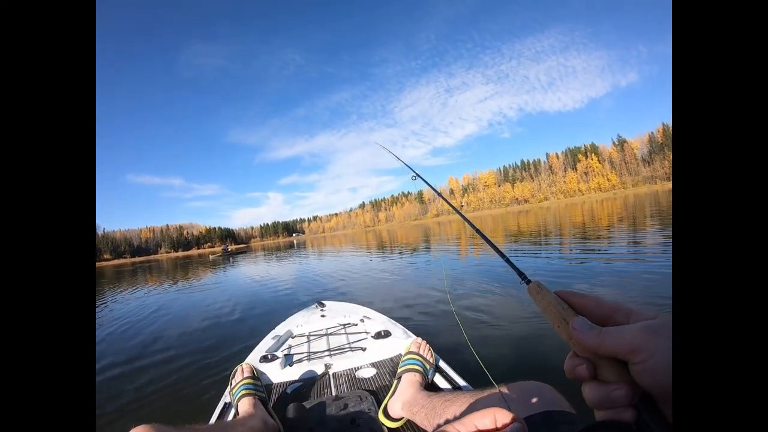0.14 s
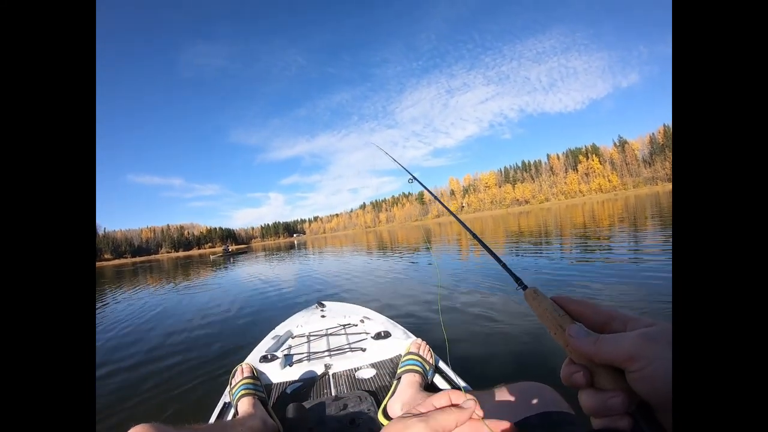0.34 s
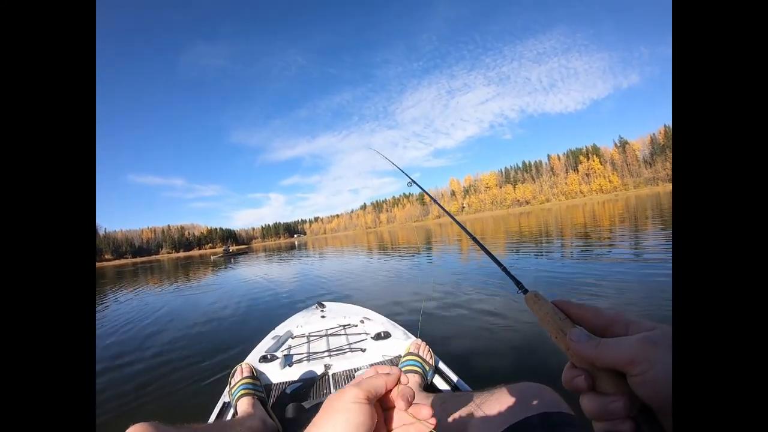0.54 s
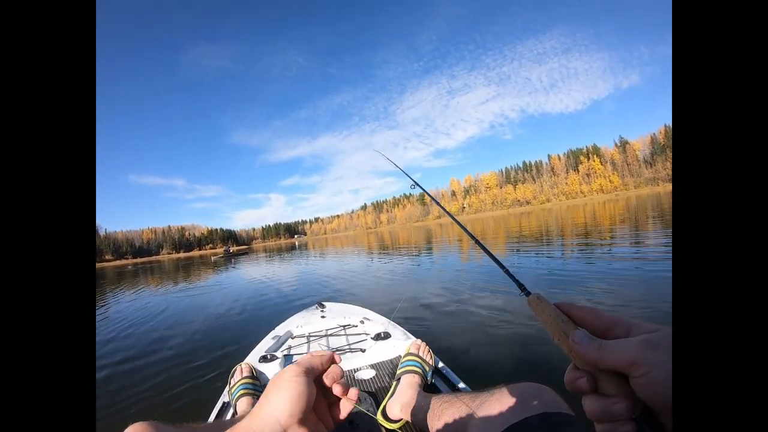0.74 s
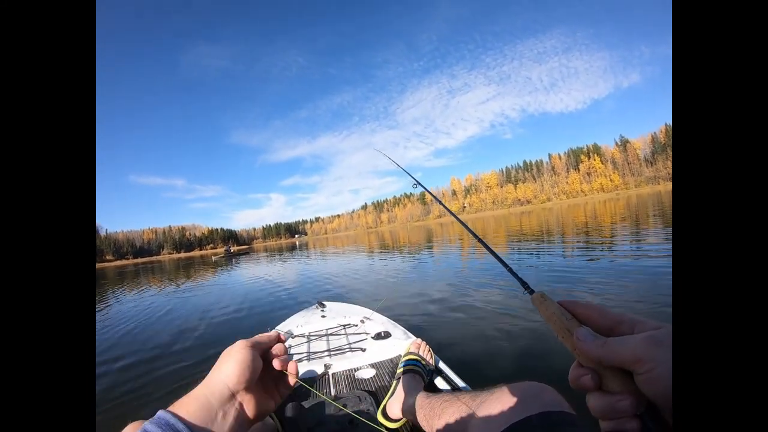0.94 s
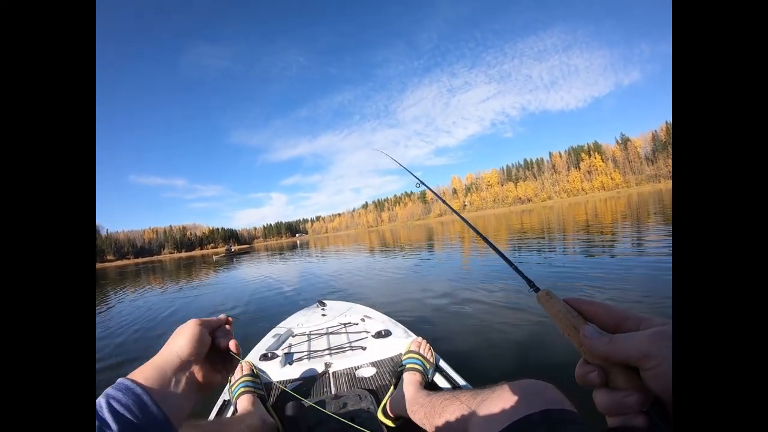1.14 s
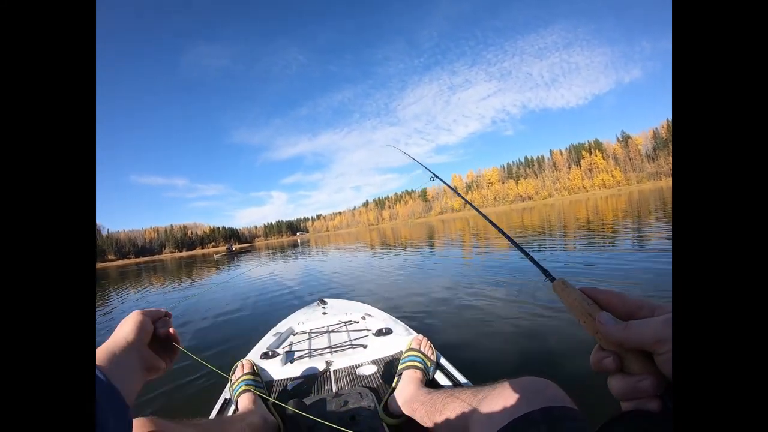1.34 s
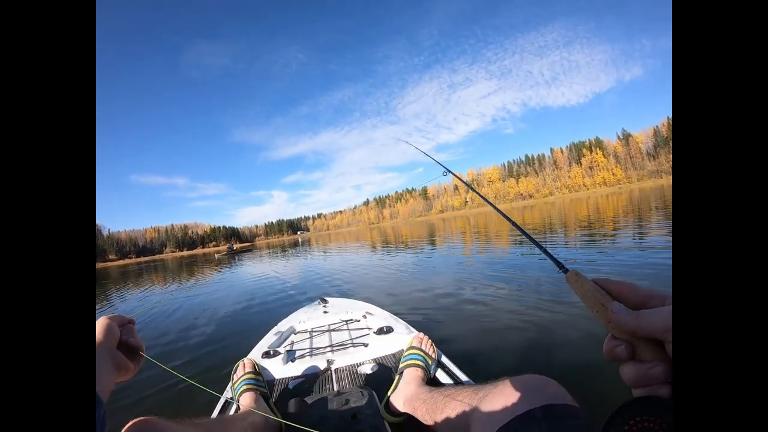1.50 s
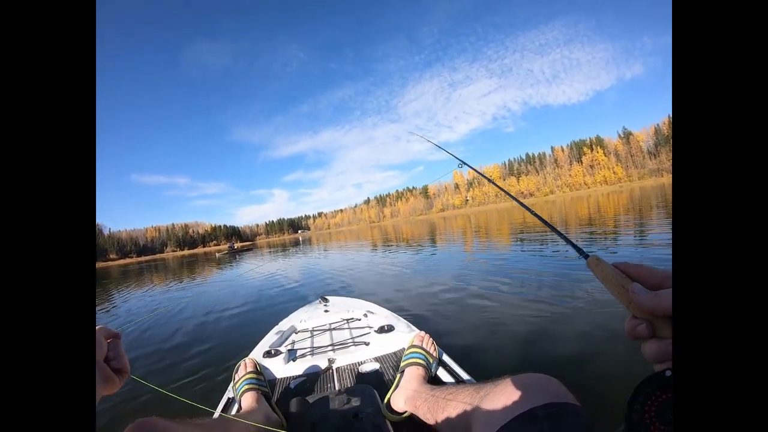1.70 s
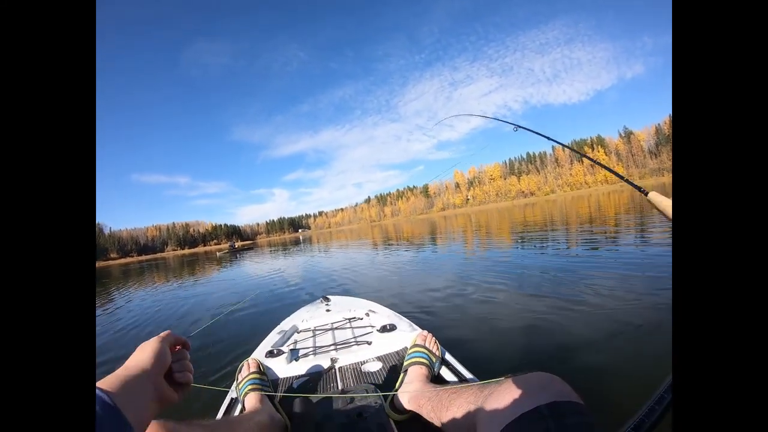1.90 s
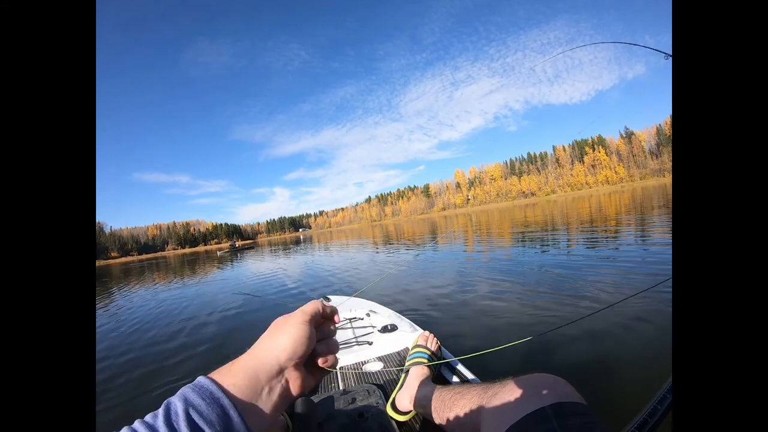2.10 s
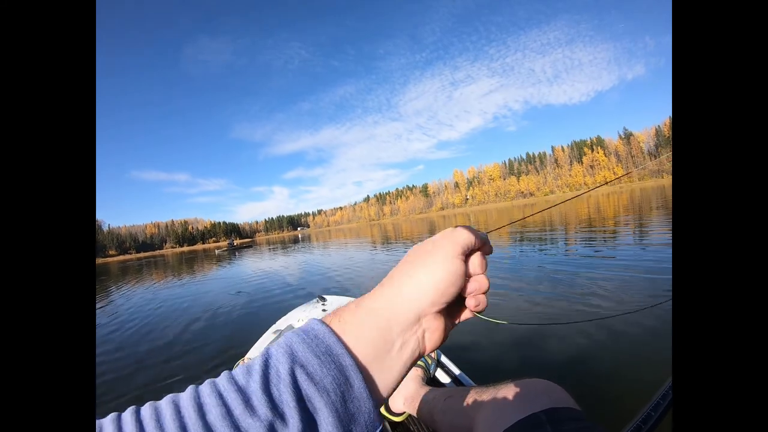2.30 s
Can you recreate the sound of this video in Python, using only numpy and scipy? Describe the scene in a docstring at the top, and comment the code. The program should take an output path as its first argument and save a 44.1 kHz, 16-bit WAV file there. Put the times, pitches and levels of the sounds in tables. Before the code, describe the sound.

Fly reel ratchet clicks, then buzzes loudly in two pulls as line is stripped off outdoors

```python
"""Line is stripped off a click-and-pawl fly reel in two pulls, in a small boat on a calm lake.
The pawl snaps over the ratchet teeth, singly, then as a buzz in each pull, then singly again;
each strike is a burst of shaped noise that rings the spool's modes, close on the right.
Afterwards the rod is swung aside: stronger soft bumps, a light knock (both dying modes) and
the hiss of sliding line. Faint outdoor noise and low buffets of air lie beneath."""
import sys
import numpy as np
from scipy import signal
from scipy.fft import rfft, irfft
from scipy.io import wavfile

SR = 44100
rng = np.random.default_rng(int(sys.argv[2]) if len(sys.argv) > 2 else 0)


def transcribe(u):
    """Save the signal u as a 16-bit wav file named by the first command-line argument.

    u: samples, shape (n,) or (channels, n), limited to [-1, 1]; the rate is SR.
    q: integer samples, one column per channel.
    """
    v = np.clip(np.atleast_2d(u).T, -1, 1)
    q = np.round(v * 32767).astype(np.int16)
    wavfile.write(sys.argv[1], SR, q)


N = 103635
TIME = np.arange(N) / SR
HZ = np.fft.rfftfreq(N, 1 / SR)

# pawl snap and spool ring as the reel moves: (time [s], relative snap level [dB], relative ring level [dB])
REEL_LEVEL = [(.2, -2.5, 0), (.42, -2, -1), (.6, -1.5, 0), (.9, -1, -4), (1.12, -2, -0.5), (1.21, -2, -3.5),
              (1.379, -2, -6.5), (1.52, -2.5, -4.5), (1.64, -3.5, -6), (1.8, 0, -7)]


def amp(db):
    """Decibels to gain."""
    return 10 ** (np.asarray(db) / 20)


def evened(x):
    """Scales to unit rms."""
    return x / np.sqrt(np.mean(x ** 2) + 1e-20)


def over_hz(table, axis=1):
    """Interpolates a table column along log frequency."""
    rows = np.array(table)
    return np.interp(np.log(HZ + 1), np.log(rows[:, 0] + 1), rows[:, axis])


def over_time(table, at_s, axis=1):
    """Interpolates a table column along time."""
    rows = np.array(table)
    return np.interp(at_s, rows[:, 0], rows[:, axis])


def add(mix, start_s, sound):
    """Mixes a sound in at start_s, in place."""
    start = max(round(start_s * SR), 0)
    part = mix[..., start:][..., :sound.shape[-1]]
    part += sound[..., :part.shape[-1]]


def pair(z, coherence):
    """Makes two unrelated signals partly alike."""
    left = coherence * z[1] + np.sqrt(1 - coherence ** 2) * z[0]
    return np.array([left, z[1]])


def mode(hz, db, t60_s, rise_s):
    """One exponentially dying partial with a soft start."""
    t = TIME[:SR // 5]
    rise = 1 - np.exp(-(t / rise_s) ** 2)
    return amp(db - 60 * t / t60_s) * rise * np.sin(2 * np.pi * hz * t)


def rustle(colour, level, coherence, flutter_db):
    """Coloured stereo noise with a gently uneven level."""
    noise = pair(rng.standard_normal((2, N)), coherence)
    noise = irfft(rfft(noise) * amp(over_hz(colour)), N)
    flutter = np.interp(TIME, np.linspace(0, TIME[-1], 120), rng.standard_normal(120))
    return evened(noise) * amp(over_time(level, TIME) + flutter_db * flutter)


def band_noise(lo_hz, hi_hz):
    """Two channels of unrelated noise in one band."""
    sos = signal.butter(2, [lo_hz, hi_hz], "band", fs=SR, output="sos")
    return evened(signal.sosfilt(sos, rng.standard_normal((2, N))))


def swell(centre_s, length_s):
    """A Gaussian rise and fall; length_s is from the centre to 1/e."""
    return np.exp(-((TIME - centre_s) / length_s) ** 2)


def air():
    """Outdoor background: broadband noise, mostly low."""
    # spectrum: (frequency [Hz], relative level [dB])
    air_colour = [(25, -5), (60, -7.5), (110, -11.5), (175, 4), (300, -5), (550, -8.5), (850, -9),
                  (1100, -10), (2000, -20), (5000, -42.5), (9000, -36), (11500, -51), (16000, -72)]
    # (time [s], level [dB])
    air_level = [(0, -67), (.06, -69.5), (.13, -68), (.3, -69.5), (1.7, -71), (1.87, -63), (2.35, -67.5)]
    return rustle(air_colour, air_level, coherence=0.24, flutter_db=3.0)


def buffets():
    """Air buffeting the microphone: short swells of low noise."""
    # (time [s], relative level [dB], length [s])
    gusts = [(0.234, -10, .03), (.5, -3, 0.022), (.64, -3, .03), (1.346, 0, .025), (1.87, 5, .02),
             (2.08, 10, .03), (2.172, 9, 0.055), (2.245, 11, 0.021)]
    envelope = sum(amp(db) * swell(s, length_s) for s, db, length_s in gusts)
    return pair(band_noise(lo_hz=25, hi_hz=70), coherence=0.58) * envelope * amp(-70.5)


def sliding_line():
    """Line and sleeve sliding: friction hiss, weaker on the left."""
    # spectrum: (frequency [Hz], relative level [dB])
    slide_colour = [(500, -58), (1500, 3), (2100, -10.5), (2800, 1), (3900, 2), (4700, 0.5), (6200, 0.5),
                    (7500, -5.5), (8600, -9), (9800, -24.5), (11000, -39), (16000, -48)]
    # (time [s], right level [dB])
    slide_level = [(0, -87), (1.1, -64), (1.85, -69.5), (1.96, -71), (2.1, -59.5), (2.22, -57), (2.35, -61)]
    left_db = -6.5
    return rustle(slide_colour, slide_level, coherence=0.1, flutter_db=3.5) * amp([[left_db], [0]])


def line_tick():
    """One small tick of the line: a brief swell of bright noise."""
    # (time [s], level [dB], frequency [Hz])
    tick = (2.246, -60, 8000)
    s, db, hz = tick
    return amp(db) * swell(s, length_s=.0015) * band_noise(0.64 * hz, 1.16 * hz)


def bumps():
    """Soft bumps of hands and legs on the boat ring damped hull modes."""
    # (time [s], relative level [dB], pitch [Hz])
    bump_events = [(.006, -6, 182), (.041, -13, 283), (0.151, -17, 175), (0.278, -31, 160),
                   (.596, -11.5, 186), (.632, -10.5, 162), (1.126, -21, 181.9), (1.347, -22, 157),
                   (1.482, -21, 197.1), (1.857, -14, 192), (2.054, 4, 175.5), (2.075, 1.5, 159),
                   (2.107, -2, 164.5), (2.215, -1.5, 169), (2.226, 2, 159.3), (2.269, -6.5, 188),
                   (2.305, -8.5, 163)]
    # (multiple of the pitch [1], relative level [dB], t60 [s])
    hull = [(.33, -9.5, 0.096), (.6, -5, 0.1), (1, 1.5, 0.12), (1.38, -3, 0.1), (2.05, -14.5, 0.071)]
    bump_db, rise_s = -45, 0.0035
    out = np.zeros((2, N))
    for s, db, hz in bump_events:
        bump = sum(mode(hz * ratio, mode_db, t60_s, rise_s) for ratio, mode_db, t60_s in hull)
        add(out, s, amp(bump_db + db) * bump)
    return out


def tackle_knock():
    """One light knock of the tackle rings short modes."""
    # (frequency [Hz], relative level [dB], t60 [s])
    knock_modes = [(506, -12, 0.031), (873, -2.5, 0.045), (1070, 7.5, 0.018), (1156, 1, 0.022),
                   (1490, -7, .025), (2250, -12, 0.026)]
    knock_s, knock_db, left_db, rise_s = 2.296, -41, -2, 0.0021
    out = np.zeros((2, N))
    knock = sum(mode(*row, rise_s) for row in knock_modes)
    add(out, knock_s, amp([[knock_db + left_db], [knock_db]]) * knock)
    return out


def teeth():
    """Time and strength of each pawl strike: one per tooth that passes."""
    # single clicks while the spool turns slowly: (time [s], strength [dB])
    slow_clicks = [(.18, -36), (.19, -30), (.2005, -1.5), (.2188, 0), (.2375, 0), (.26, .5), (.2832, 0),
                   (.3068, 1), (.3257, .5), (.3424, 1), (.3581, 0), (.3741, 1), (.3893, 0), (.4033, -.5),
                   (.4165, 0), (.4293, -1.5), (.4428, -1), (.4551, 0), (1.187, -26), (1.6593, -1.5),
                   (1.6707, 0), (1.6826, -.5), (1.6954, 0), (1.7083, .5), (1.7224, -1), (1.7369, -2),
                   (1.7552, -.5), (1.777, -1), (1.8086, -2)]
    # spool speed in each pull: (time [s], speed [teeth/s])
    first_pull = [(0.4671, 94.6), (0.516, 102), (0.5961, 121.7), (0.7021, 118.4), (0.7222, 90.8),
                  (0.8042, 104.3), (0.8683, 94.1), (0.9428, 103.8), (1.0892, 93.6), (1.1285, 67.6)]
    second_pull = [(1.2048, 128.8), (1.2812, 115.1), (1.313, 152.6), (1.3724, 123.6), (1.393, 133.2),
                   (1.501, 112.3), (1.52, 99.7), (1.5411, 111.4), (1.6515, 74.83)]
    jitter_s, spread_db = .00008, .6
    rows = list(slow_clicks)
    for pull in (first_pull, second_pull):
        t = np.arange(pull[0][0], pull[-1][0], 1 / SR)
        passed = np.cumsum(over_time(pull, t)) / SR
        strikes_s = np.interp(np.arange(passed[-1]), passed, t)  # whole teeth
        rows += [(s, 0) for s in strikes_s]
    when_s, db = np.transpose(rows)
    chance = rng.standard_normal((len(rows), 2))
    return when_s + jitter_s * chance[:, 0], db + spread_db * chance[:, 1]


def scrapes(when_s, db):
    """Faint bright ticks as the pawl climbs each tooth, just before it drops."""
    scrape_db, spread_db = -50, 4
    lead_s, lead_spread, decay_s = .0042, 0.22, .0007
    chance = rng.standard_normal((len(when_s), 2))
    at_s = when_s - lead_s * (1 + lead_spread * chance[:, 0])
    ticks = np.zeros(N)
    ticks[np.round(at_s * SR).astype(int)] = amp(scrape_db + db + spread_db * chance[:, 1])
    shape = np.exp(-TIME[:SR // 100] / decay_s)
    return signal.oaconvolve(ticks, shape)[:N] * band_noise(lo_hz=4630, hi_hz=15700)


def spool(when_s, db):
    """Every strike rings the modes of spool and frame, each a little differently."""
    # (frequency [Hz], relative level [dB], t60 [s], left minus right [dB])
    spool_modes = [(1166, -34, 0.04, -11), (1300, -31, 0.044, -20.5), (1520, -32.5, 0.021, 0.5),
                   (2508, -24, 0.058, -5), (2723, -16, 0.028, -32), (2860, -11.5, 0.034, -30),
                   (2946, 1.5, 0.015, -44), (2971, -8.5, .052, -11), (3410, -16, 0.01, -32),
                   (5430, -16, 0.0092, 8.5), (6660, -20, 0.0089, 12), (7890, -1.5, 0.012, -1),
                   (8700, -6, .011, -32)]
    ring_db, uneven_db = -23.5, 1.55
    rise_s, left_lag_s = 0.00084, .00004
    out = np.zeros((2, N))
    at = np.round(when_s * SR).astype(int)
    level_db = db + over_time(REEL_LEVEL, when_s, axis=2) + ring_db
    for hz, mode_db, t60_s, left_db in spool_modes:
        strikes = np.zeros(N)
        strikes[at] = amp(level_db + uneven_db * rng.standard_normal(len(at)))
        ring = signal.oaconvolve(strikes, mode(hz, mode_db, t60_s, rise_s))[:N]
        left = amp(left_db) * np.interp(TIME - left_lag_s, TIME, ring)
        out += [left, ring]
    return out


def pawl(when_s, db):
    """Each strike is a few milliseconds of metal chatter: never twice alike, but evened in force."""
    # spectrum: (frequency [Hz], relative level [dB])
    snap_colour = [(200, -39.5), (650, -32), (1250, -16), (1850, -26), (2500, -13), (3000, -13),
                   (3400, -9.5), (4000, -12), (4500, -8), (5500, -4), (6900, 0.5), (7900, -5.5), (8700, -2),
                   (9500, -13), (11000, -17), (12200, -17.5), (13800, -28), (15700, -28.5)]
    # (frequency [Hz], left minus right [dB], left phase lead [rad])
    snap_stereo = [(1290, -9, -2.5), (3020, -4.5, -2), (4750, -10.5, -2.5), (6680, -3.5, -3),
                   (8430, -11, -3), (9650, 2, -1), (12200, -1, -6), (15900, -2, -4)]
    snap_db, rise_s, decay_s = -5, .0007, .0017
    t = TIME[:SR // 80]
    shape = (1 - np.exp(-(t / rise_s) ** 2)) * np.exp(-t / decay_s)
    chatter = pair(rng.standard_normal((2, len(when_s), len(t))), coherence=0.73) * shape
    colour = evened(amp(over_hz(snap_colour)))
    # equal energy per strike and channel, as heard through the colour
    short_hz = np.fft.rfftfreq(len(t), 1 / SR)
    heard = irfft(rfft(chatter) * np.interp(short_hz, HZ, colour))
    chatter /= np.linalg.norm(heard, axis=2, keepdims=True)
    out = np.zeros((2, N))
    for k, level_db in enumerate(db + over_time(REEL_LEVEL, when_s)):
        add(out, when_s[k], amp(snap_db + level_db) * chatter[:, k])
    spectrum = rfft(out) * colour
    spectrum[0] *= amp(over_hz(snap_stereo)) * np.exp(1j * over_hz(snap_stereo, axis=2))
    return irfft(spectrum, N)


def boat(x):
    """Adds dull reflections from angler and deck and a short scatter; open water adds no more."""
    # (delay [s], level [dB])
    echo_taps = [(.0063, -9), (.0092, -15), (.0118, -20)]
    scatter_db, scatter_t60_s, dull_hz = -16.5, 0.013, 3400
    t = TIME[:SR // 8]
    scatter = rng.standard_normal((2, len(t))) * amp(-60 * t / scatter_t60_s) * (t > .003)
    scatter *= amp(scatter_db) / np.linalg.norm(scatter[0])
    echoes = sum(amp(db) * np.exp(-2j * np.pi * HZ * delay_s) for delay_s, db in echo_taps)
    echoes /= np.sqrt(1 + (HZ / dull_hz) ** 6)
    return x + irfft(rfft(x) * echoes, N) + signal.oaconvolve(x, scatter, axes=1)[:, :N]


def scene():
    """The quiet of the lake, sliding line, handling and the reel."""
    background = air() + buffets()
    handling = sliding_line() + line_tick() + bumps() + tackle_knock()
    when_s, db = teeth()
    reel = boat(scrapes(when_s, db) + spool(when_s, db) + pawl(when_s, db))
    return background + handling + reel


def record(dry):
    """The band limit of the recorder: a linear-phase low-pass."""
    low_pass = signal.firwin(255, 16200, window=("kaiser", 9), fs=SR)  # cutoff in Hz
    return signal.oaconvolve(dry, low_pass[None], "same")


dry = scene()
out = record(dry)
transcribe(out)
```